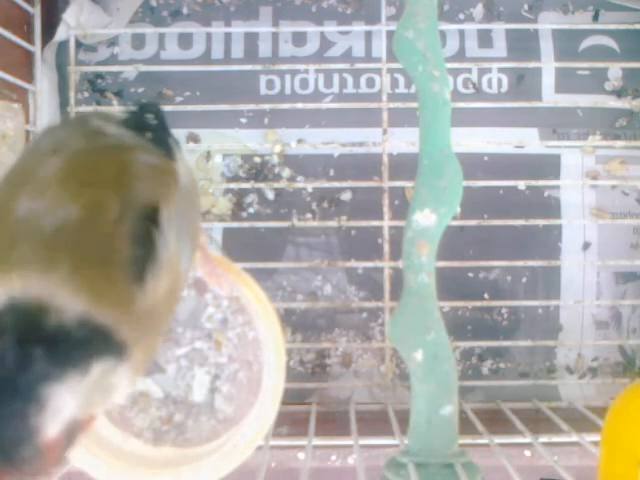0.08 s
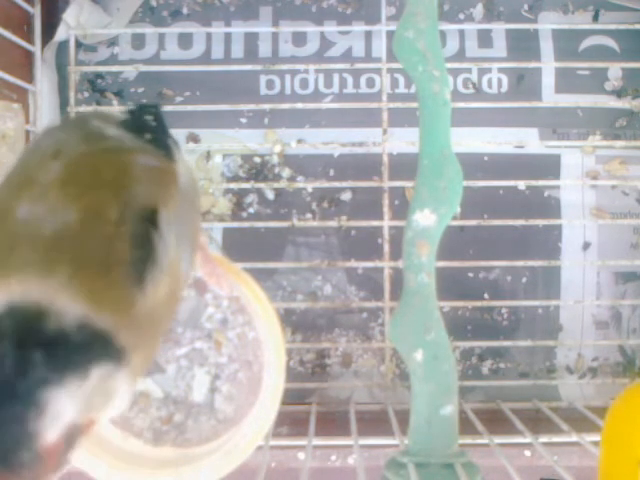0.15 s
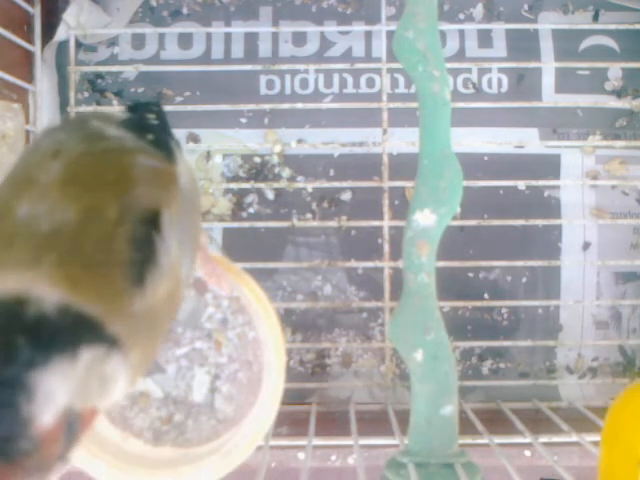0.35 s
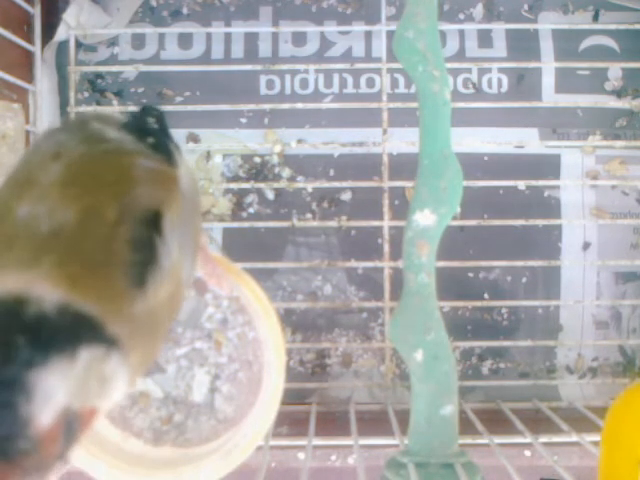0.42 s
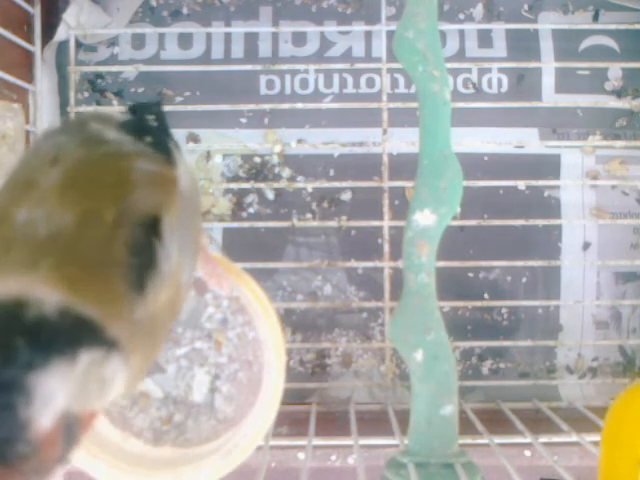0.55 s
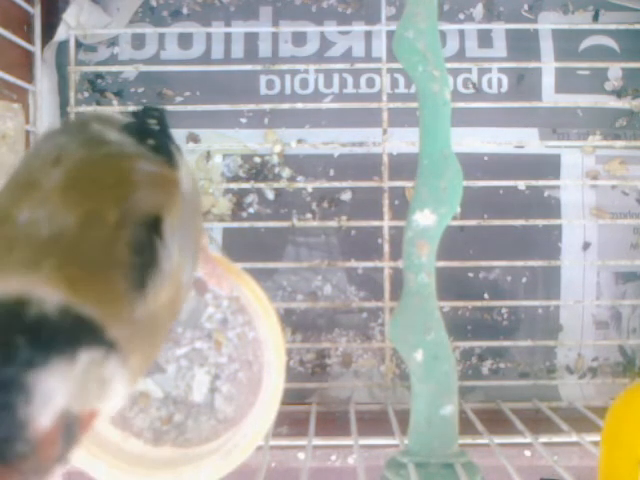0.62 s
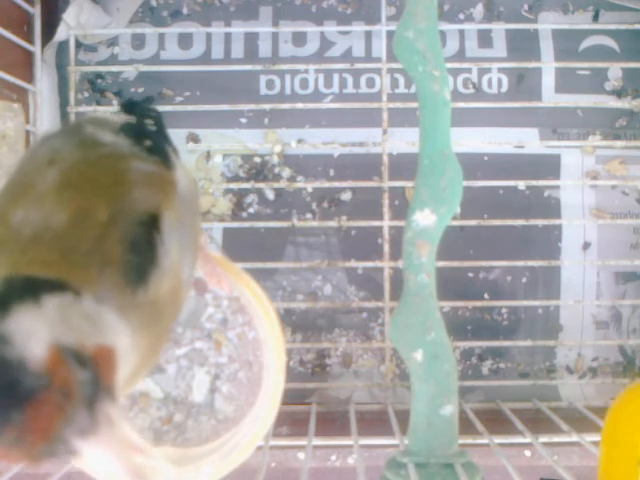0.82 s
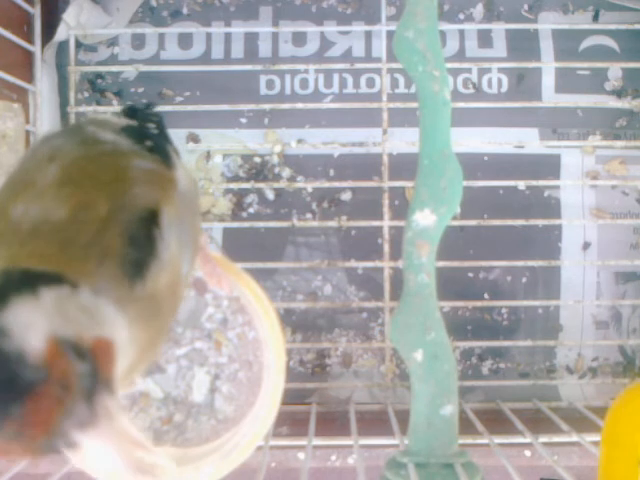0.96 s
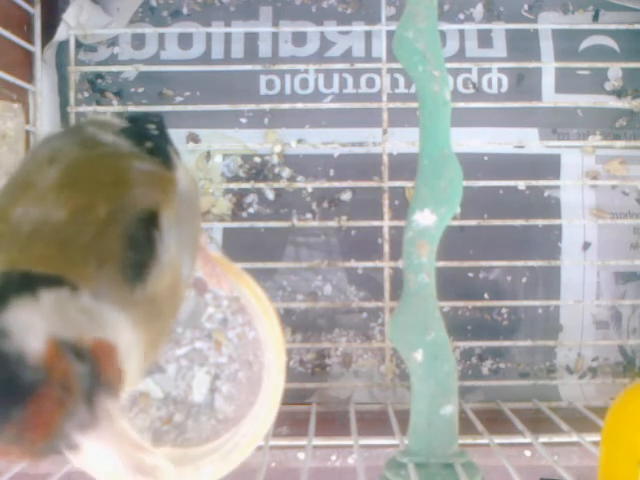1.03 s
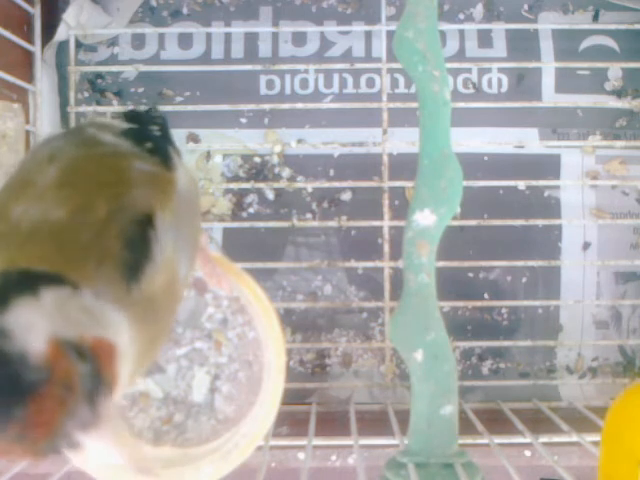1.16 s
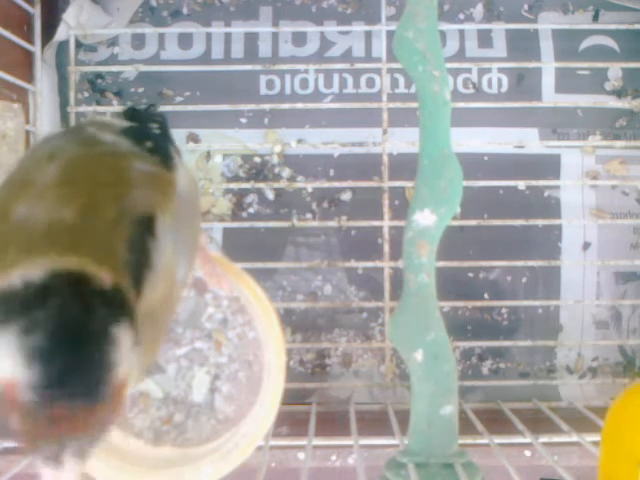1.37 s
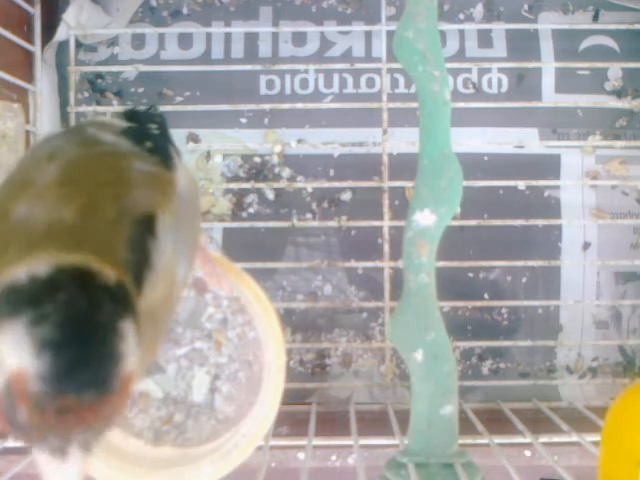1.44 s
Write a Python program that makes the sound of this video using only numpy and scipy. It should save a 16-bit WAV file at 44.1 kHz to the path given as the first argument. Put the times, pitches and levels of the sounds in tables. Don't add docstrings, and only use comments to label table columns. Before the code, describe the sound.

Close finch song indoors: quick sharp chips, then four piercing downward whistles, each tumbling into a brief buzz

```python
import sys
import numpy as np
from scipy import signal
from scipy.fft import rfft, irfft
from scipy.io import wavfile
from scipy.ndimage import uniform_filter1d, minimum_filter1d

SR = 44100
rng = np.random.default_rng(int(sys.argv[2]) if len(sys.argv) > 2 else 0)


def dump_mix(stems):
    frames = np.atleast_2d(stems).T
    limited = np.clip(frames, -1, 1)
    pcm = np.round(limited * 32767).astype(np.int16)
    wavfile.write(sys.argv[1], SR, pcm)


def natural_amplitude(level_db):
    exponent = np.asarray(level_db, float) / 20
    return 10 ** exponent


N = 66150

# pitch_hz, level_db (per Hz)
FLOOR_SPECTRUM = [(12, -43.5), (20, 6), (116, -7.5), (759, -14.5), (1090, -15.5), (2600, -25),
                  (2990, -27.5), (16000, -45.5)]
# time_s, level_db
FLOOR_LEVEL = [(0.0, -50.5), (1.34, -59), (1.5, -62)]
# pitch_hz, level_db
HUM = [(70, -61.5), (123, -63.5)]

# time_s, pitch_hz, level_db
CHIP_1 = [(.197, 2030, -34.5), (.201, 2270, -31.5), (.204, 2700, -18), (.208, 3160, -9.5), (.213, 3694, -7),
          (.219, 4010, -13), (.223, 4210, -13), (.227, 4370, -24.5), (.231, 4480, -37)]
CHIP_1_LOW = [(.214, 3366, -45), (.219, 3673, -22.5), (.223, 3900, -16.5), (.227, 4020, -17.5),
              (.232, 3860, -36)]
CHIP_2 = [(.275, 2560, -26.5), (.279, 2806, -20.5), (.283, 2890, -17), (.288, 3083, -15),
          (.292, 3100, -17.5), (.297, 3260, -30.5)]
CHIP_3 = [(.297, 3183, -29), (.3, 3650, -12), (.304, 4600, -9.5), (.308, 4975, -8.5), (.316, 5260, -9.5),
          (.323, 5180, -15.5), (.328, 5500, -33.5)]
CHIP_3_LOW = [(0.304, 3910, -31.5), (0.309, 4180, -15.5), (0.322, 4540, -16.5), (0.33, 4970, -44.5)]
# time_s, pitch_hz, level_db
CHIP_4 = [
    [(.351, 2400, -40.5), (.355, 2600, -30.5), (.362, 2670, -20), (.373, 2750, -15.5), (.3765, 2800, -21.5)],
    [(.378, 2914, -20), (.380, 2950, -9), (.3833, 3030, -13.5)],
    [(.3848, 3080, -9.5), (.391, 3200, -11), (.398, 3350, -10.5), (.402, 3450, -22), (.407, 3600, -39)],
]
# time_s, pitch_hz, level_db
CHIP_5 = [(.439, 6460, -25.5), (.443, 6020, -18.5), (.45, 6080, -19.5), (.456, 6080, -8.5),
          (.461, 6085, -7), (.469, 6050, -5.5), (.475, 5883, -16), (.483, 6260, -33.5)]
CHIP_5_HIGH = [(0.441, 6650, -41), (0.444, 6960, -33.5), (.456, 7220, -24), (0.465, 7130, -30.5),
               (.468, 7480, -23.5), (0.474, 7140, -27), (.479, 7050, -47.5)]
CHIP_6 = [(.535, 4750, -42.5), (.542, 4820, -20.5), (.547, 4955, -10.5), (.551, 4990, -7),
          (.555, 5130, -4.5), (.563, 5100, -9), (.569, 5243, -17.5), (.575, 5220, -36.5)]
CHIP_7 = [(.62, 2150, -34.5), (.627, 2476, -33), (.636, 2784, -23.5), (.645, 3216, -12), (.649, 3370, -9.5),
          (.654, 3750, -10), (.658, 3884, -7), (.664, 3976, -9), (.668, 4050, -34)]
CHIP_7_HIGH = [(0.622, 2720, -47), (0.628, 2990, -26.5), (.631, 3140, -18), (0.638, 3363, -16),
               (0.642, 3515, -21), (.646, 3760, -21), (.65, 3845, -45)]
# time_s, level_db
OCTAVE_2 = [(.275, -21.5), (0.278, -20.5), (.283, -23.5), (.288, -14.5), (.292, -23), (0.299, -28.5)]
OCTAVE_7 = [(.62, -40.5), (.625, -35), (.63, -17), (.634, -20.5), (.639, -33), (.647, -41.5), (.655, -38),
            (.668, -52)]
# time_s, pitch_hz, level_db
GLIDES = [
    [(.7135, 9160, -33.5), (.718, 8720, -14.5), (.723, 8027, -12.5), (.729, 7680, -18), (.743, 7100, -16),
     (.758, 6430, -8), (.768, 5830, -16.5), (.775, 5550, -9.5), (.781, 5500, -27)],
    [(.852, 8900, -17.5), (.86, 8010, -11), (.867, 7740, -17.5), (.876, 7270, -18.5), (.887, 6740, -12),
     (.898, 6300, -9.5), (.907, 5800, -10), (.914, 5670, -10), (.917, 5800, -19.5)],
    [(.983, 8900, -24), (.987, 8460, -12), (.992, 7970, -9.5), (1.013, 7060, -15), (1.027, 6470, -12.5),
     (1.037, 6164, -11.5), (1.046, 5700, -7.5), (1.052, 5720, -11), (1.054, 5850, -31.5)],
    [(1.1225, 8740, -22), (1.13, 8000, -11), (1.138, 7465, -15), (1.151, 6891, -19.5), (1.168, 6240, -9),
     (1.177, 6090, -18), (1.187, 5500, -12), (1.191, 5530, -9.5), (1.195, 5550, -23)],
]
# time_s, pitch_hz, level_db
UNDERS = [
    [(0.72, 4563, -38), (0.734, 4400, -23.5), (0.744, 4123, -15), (0.754, 3905, -17.5), (0.762, 3455, -31),
     (0.768, 3580, -39)],
    [(0.858, 4800, -40.5), (0.882, 4130, -13), (0.892, 3960, -18), (0.9, 3680, -33)],
    [(0.99, 4724, -40.5), (1.0, 4499, -29.5), (1.02, 4080, -15.5), (1.03, 3972, -26), (1.038, 3925, -43.5)],
    [(1.13, 4720, -41), (1.146, 4258, -25), (1.16, 4020, -17.5), (1.17, 3890, -26), (1.178, 3877, -34)],
]
# start_s, stretch (ratio), pitch (ratio), level_db, flick_short_hz
BREAKS = [
    (0.78, 1.003, 1.002, 5.5, 700),
    (0.9169, 1.035, 1.014, 4.5, 99.6),
    (1.0561, .93, .99, 3.5, 30.1),
    (1.196, 0.97, .995, 3.5, 30.2),
]
# after_break_s, pitch_hz, level_db
TUMBLE = [(-.001, 6000, -32), (.0015, 6840, -23.5), (.004, 5703, -12), (.007, 4886, -15.5),
          (.011, 5063, -18.5), (.016, 4776, -24.5), (.023, 3400, -21.5), (.031, 2418, -33),
          (.038, 1814, -45)]
TUMBLE_LOW = [(0.012, 4200, -27), (0.014, 3733, -22.5), (0.018, 3027, -23.5), (0.028, 1775, -34.5),
              (.035, 1400, -34.5), (0.037, 1130, -48)]
# after_break_s, level_db
OCTAVE_TUMBLE = [(0, -48), (.002, -39), (.005, -47.5), (.009, -39), (.014, -41.5), (.019, -57)]

# pitch_hz, level_db
THROAT = [(1200, -20), (2200, -11.5), (3500, 0.5), (5000, 6.8), (6500, -11), (8500, -13), (11500, -3.5),
          (16000, -22)]
SOLO_DB = {"chip": [-20, -26, -29.5, -46], "rich": [-42.5, -12.5, -24, -26.5], "whistle": [-14, -28.5, -48,
           -40], "soft": [-28.5, -31, -45.5, -59]}
DUET = [(1, -1), (1, 1), (0, 2), (2, -1), (2, 0), (3, 0), (-1, 2), (2, 1), (1, 2)]
DUET_DB = {"glide": [-20.5, -2.5, 6.5, -5.5, -24, -63.5, -61.5, -58.5, -30.5, -19], "close": [-37.5, -22.5,
           -29, -41, -21, -25.5, -37, -32, -38.5, -36], "rasp": [-35, -2.5, -12, -22.5, -46.5, -30, -15, -9,
           -11, -20]}
# level_db of each combination tone, then of breath
BUZZ_DB = [-26.5, -6.5, -11, -9, -19, -22, -18.5]

# time_s, pitch_hz, level_db
YELP = [(1.23, 764, -53.5), (1.305, 940, -47.5), (1.325, 942, -53), (1.43, 880, -64)]
CROW = [(1.43, 509, -78), (1.452, 501, -54), (1.5, 510, -52)]
YELP_DB = [2, -20, -7.5]
CROW_DB = [-11, -6, 0.5, -1.5, -9, -12, -7.5]

FLOOR_LIFT_DB = 4.5
WHINE_HZ, WHINE_DB, WHINE_WIDTH_HZ = 10480, -77, 40
ATTACK_S, FADE_S = .001, .00096
FLUTTER_DB, FLUTTER_HZ = .55, 150
WOBBLE, WOBBLE_HZ = .001, 200
PATCHY_DB, PATCHY_HZ = 3, 70
BREATH_LOW_HZ, BREATH_HIGH_HZ = 3200, 12000
BUZZ_TOP_HZ, BUZZ_ROLL_DB = 6000, 26.5
SHORT_FLICK_DB = 8.5
NOTCH_HZ, NOTCH_WIDTH_HZ = 12700, 1100
ROOM_DB, ROOM_T60_S, WALL_CUT_HZ = -29.5, 0.32, 9900
ECHO_S, ECHO_DB = .044, -8
LIMIT_DB, LIMIT_SMOOTH_S = -5.5, 0.00039
CUTOFF_HZ = 16550


def rms_one(x):
    return x / np.sqrt(np.mean(x ** 2) + 1e-20)


def at_hz(points, hz):
    points_hz, points_db = np.transpose(points)
    return np.interp(np.log(np.maximum(hz, 1)), np.log(points_hz), points_db)


def level_at(s, db):
    return np.interp(np.arange(N) / SR, s, db)


def drift(rate_hz, size=N):
    settle = SR // 20
    r = np.exp(-2 * np.pi * rate_hz / SR)
    slow = signal.lfilter([1], [1, -2 * r, r * r], rng.standard_normal(size + settle))
    return rms_one(slow)[settle:]


def background():
    hz = np.fft.rfftfreq(N, 1 / SR)
    white = rfft(rng.standard_normal(N))
    s, db = np.transpose(FLOOR_LEVEL)
    air = rms_one(irfft(white * natural_amplitude(at_hz(FLOOR_SPECTRUM, hz)), N))
    air = air * natural_amplitude(level_at(s, db) + FLOOR_LIFT_DB)
    lines = [(line_hz, line_db, 8.0) for line_hz, line_db in HUM]
    lines.append((WHINE_HZ, WHINE_DB, WHINE_WIDTH_HZ))
    electric = np.zeros(N)
    for line_hz, line_db, width_hz in lines:
        narrow = white / (1 + ((hz - line_hz) / width_hz) ** 2)
        electric += natural_amplitude(line_db) * rms_one(irfft(narrow, N))
    return air + natural_amplitude(level_at(s, db - np.mean(db))) * electric


def voice(rows, wobble, flutter_db):
    s, hz, db = np.transpose(rows)
    t = np.arange(N) / SR
    pitch = np.interp(t, s, hz) * (1 + wobble)
    phase = np.cumsum(2 * np.pi * pitch / SR)
    opening = (t - s[0]) / ATTACK_S
    closing = (s[-1] - t) / FADE_S + .5
    gate = np.clip(np.minimum(opening, closing), 0, 1)
    return pitch, phase, level_at(s, db) + flutter_db, gate


def breath(size):
    band = signal.butter(4, [BREATH_LOW_HZ, BREATH_HIGH_HZ], "band", fs=SR, output="sos")
    return rms_one(signal.sosfilt(band, rng.standard_normal(size)))


def note(one, two, mixes, mixes_db, roll_db=0):
    if two is None:
        two = (one[0], one[1], one[2], 0 * one[3])
    start, size = np.argmax(one[3] + two[3] > 0), SR // 10
    hz_1, phase_1, db_1, gate_1 = (part[start:start + size] for part in one)
    hz_2, phase_2, db_2, gate_2 = (part[start:start + size] for part in two)
    tones = natural_amplitude(db_1) * gate_1 * np.sin(phase_1) + natural_amplitude(db_2) * gate_2 * np.sin(phase_2)
    drive_1 = db_1 - at_hz(THROAT, hz_1)
    drive_2 = db_2 - at_hz(THROAT, hz_2)
    for (m, n), strength_db in zip(mixes, mixes_db):
        hz = np.abs(m * hz_1 + n * hz_2)
        if n == 0:
            db = drive_1
        elif m == 0:
            db = drive_2
        elif m + n == 0:
            db = (drive_1 + drive_2) / 2
        else:
            octaves_over = np.log2(np.maximum(hz / BUZZ_TOP_HZ, 1))
            db = np.minimum(drive_1, drive_2) - roll_db * octaves_over
        gate = (gate_1 if m else 1) * (gate_2 if n else 1) * (hz < SR / 2)
        db = db + strength_db + at_hz(THROAT, hz) + PATCHY_DB * drift(PATCHY_HZ, size=size)
        phase = m * phase_1 + n * phase_2 + rng.uniform(0, 2 * np.pi)
        tones = tones + natural_amplitude(db) * gate * np.sin(phase)
    breath_db = mixes_db[-1] + (db_1 + db_2) / 2 + PATCHY_DB * drift(PATCHY_HZ, size=size)
    sound = np.zeros(N)
    sound[start:start + size] = np.sqrt(2) * tones + natural_amplitude(breath_db) * gate_1 * breath(size)
    return sound


def octave(rows, levels, chance):
    _, phase, _, gate = voice(rows, *chance)
    return np.sqrt(2) * natural_amplitude(level_at(*np.transpose(levels))) * gate * np.sin(2 * phase)


def chips(left, right):
    solos = [(CHIP_1, "chip"), (CHIP_2, "rich"), (CHIP_6, "whistle")]
    solos += [(part, "soft") for part in CHIP_4]
    duets = [(CHIP_3, CHIP_3_LOW, "close"), (CHIP_5, CHIP_5_HIGH, "close"), (CHIP_7, CHIP_7_HIGH, "rasp")]
    overtones = [(2, 0), (3, 0), (4, 0)]
    song = note(voice(CHIP_1_LOW, *right), None, [], SOLO_DB["chip"])
    for rows, kind in solos:
        song += note(voice(rows, *left), None, overtones, SOLO_DB[kind])
    for a, b, kind in duets:
        song += note(voice(a, *left), voice(b, *right), DUET, DUET_DB[kind])
    return song + octave(CHIP_2, OCTAVE_2, left) + octave(CHIP_7, OCTAVE_7, left)


def falling_notes(left, right):
    return sum(note(voice(high, *left), voice(low, *right), DUET, DUET_DB["glide"])
               for high, low in zip(GLIDES, UNDERS))


def tumbles(left):
    buzz = [(k + 1, -k) for k in (-2, 1, 2, 3, 4, 5)]
    song = np.zeros(N)
    for s, stretch, ratio, db, short_hz in BREAKS:
        a, b = (np.array(rows) * [stretch, ratio, 1] + [s, 0, db] for rows in (TUMBLE, TUMBLE_LOW))
        a[:2] += [0, -short_hz, SHORT_FLICK_DB * short_hz / 1000]
        song += note(voice(a, *left), voice(b, *left), buzz, BUZZ_DB, BUZZ_ROLL_DB)
        song += octave(a, np.array(OCTAVE_TUMBLE) + [s, 0], left)
    return song


def finch():
    left, right = [(WOBBLE * drift(WOBBLE_HZ), FLUTTER_DB * drift(FLUTTER_HZ)) for _ in range(2)]
    song = chips(left, right) + falling_notes(left, right) + tumbles(left)
    return signal.lfilter(*signal.iirnotch(NOTCH_HZ, NOTCH_HZ / NOTCH_WIDTH_HZ, fs=SR), song)


def room(x):
    t = np.arange(SR // 2) / SR
    tail = rng.standard_normal(len(t)) * natural_amplitude(-60 * t / ROOM_T60_S) * (t > .004)
    tail = signal.lfilter(*signal.butter(1, WALL_CUT_HZ, fs=SR), tail)
    tail = rms_one(tail) / np.sqrt(len(tail))
    tail[int(ECHO_S * SR)] += natural_amplitude(ECHO_DB)
    return signal.fftconvolve(x, tail)[:N]


def far_call(rows, harmonics_db):
    _, phase, db, gate = voice(rows, .007 * drift(60), 0)
    call = np.zeros(N)
    for k, strength_db in enumerate(harmonics_db, start=1):
        call += natural_amplitude(db + strength_db) * drift(PATCHY_HZ) * np.sin(k * phase)
    return gate * call


def scene():
    bird = finch()
    far = far_call(YELP, YELP_DB) + far_call(CROW, CROW_DB)
    return (background() + bird + natural_amplitude(ROOM_DB) * room(bird) + far)[None]


def band_limit(x):
    return signal.sosfilt(signal.butter(12, 16290, fs=SR, output="sos"), x)


def record(dry):
    size = int(LIMIT_SMOOTH_S * SR)
    gain = np.minimum(1, natural_amplitude(LIMIT_DB) / (np.abs(dry) + 1e-9))
    held = dry * uniform_filter1d(minimum_filter1d(gain, size=size), size=size)
    low_pass = signal.cheby2(16, 70, CUTOFF_HZ, fs=SR, output="sos")
    mix = signal.sosfilt(low_pass, held)
    return band_limit(mix)


dry = scene()
out = record(dry)
dump_mix(out)
```